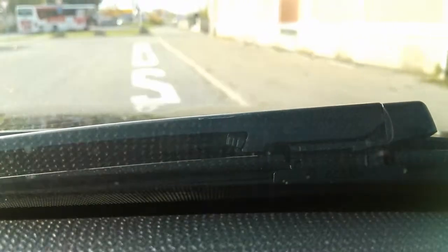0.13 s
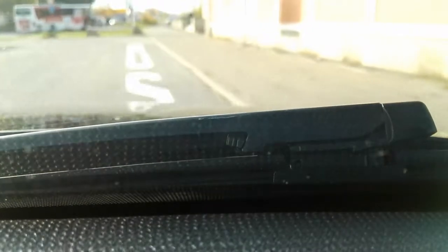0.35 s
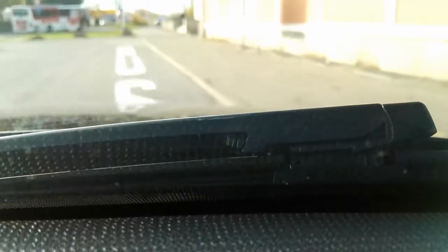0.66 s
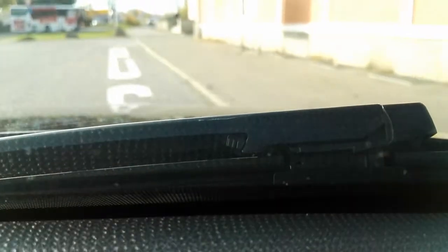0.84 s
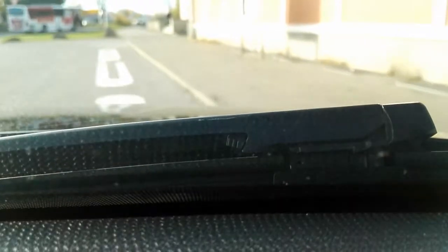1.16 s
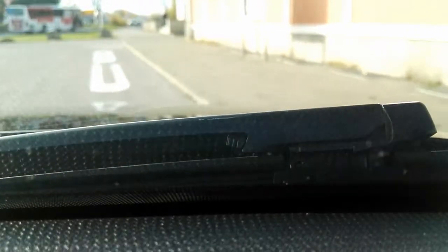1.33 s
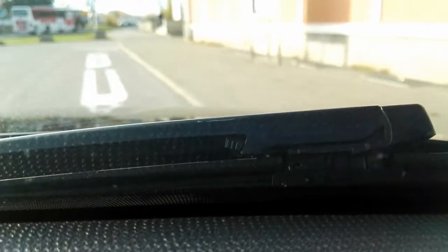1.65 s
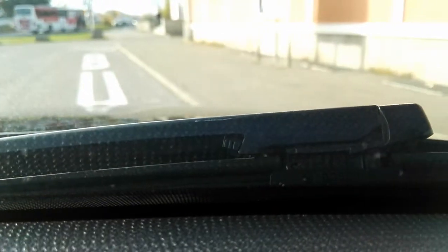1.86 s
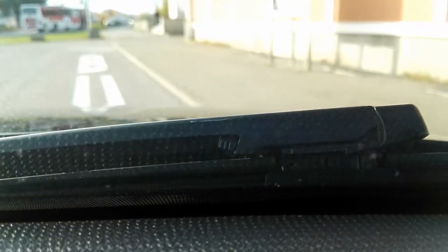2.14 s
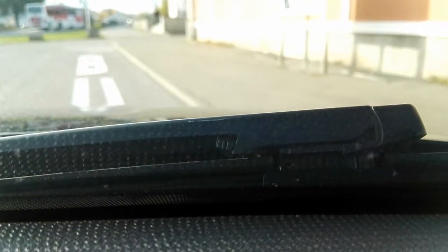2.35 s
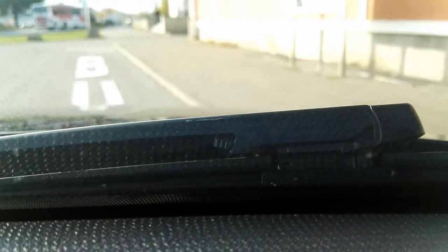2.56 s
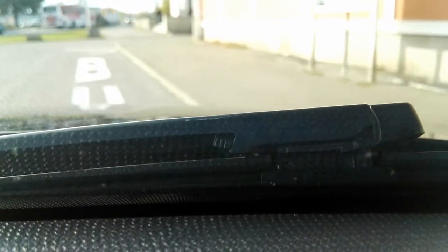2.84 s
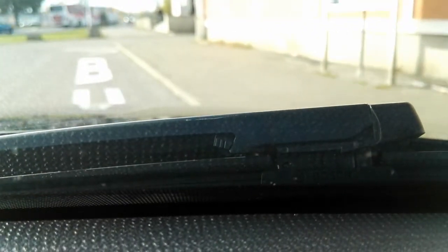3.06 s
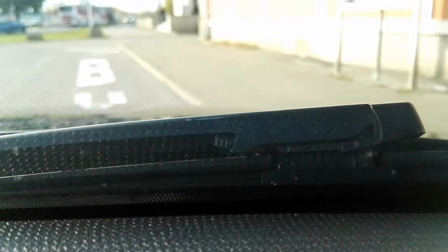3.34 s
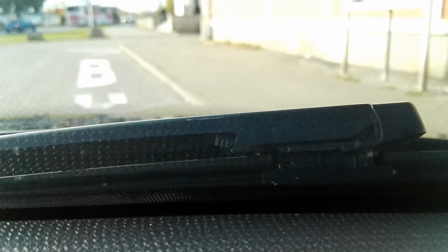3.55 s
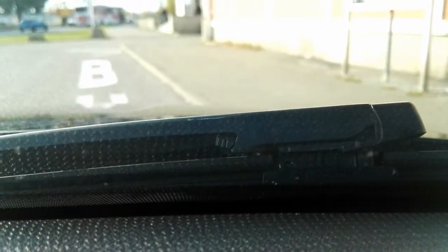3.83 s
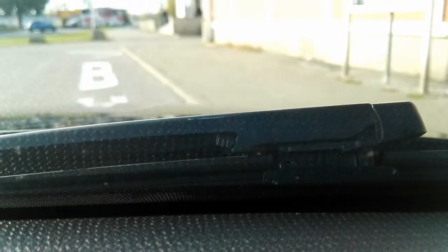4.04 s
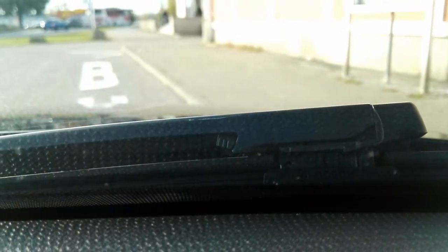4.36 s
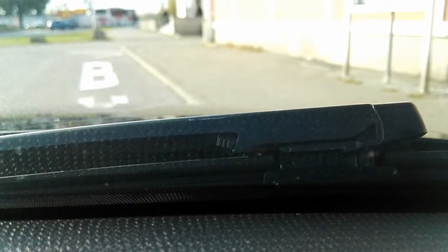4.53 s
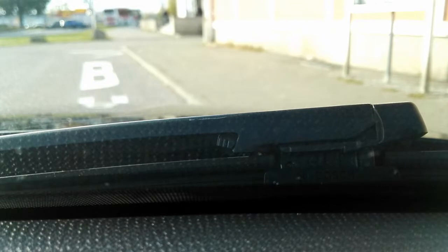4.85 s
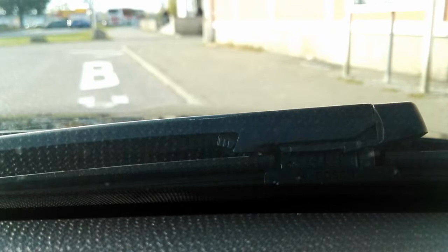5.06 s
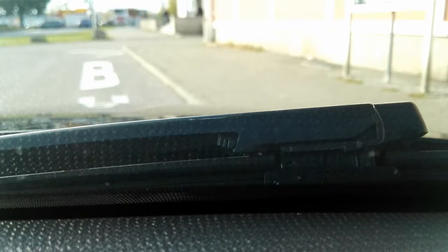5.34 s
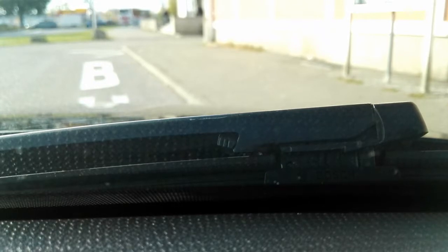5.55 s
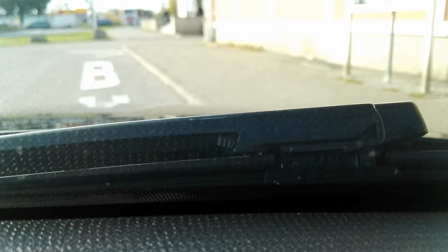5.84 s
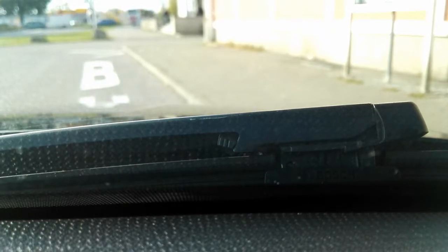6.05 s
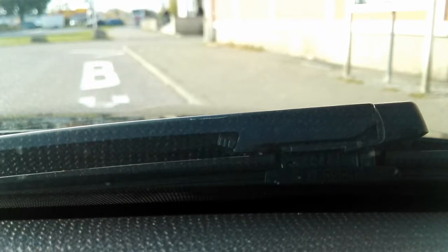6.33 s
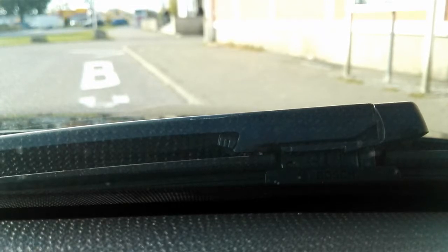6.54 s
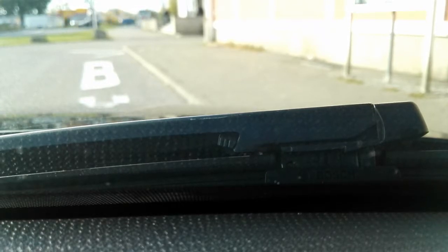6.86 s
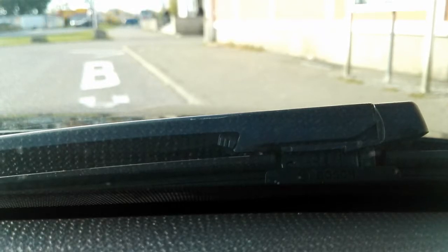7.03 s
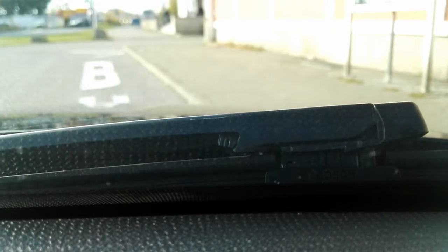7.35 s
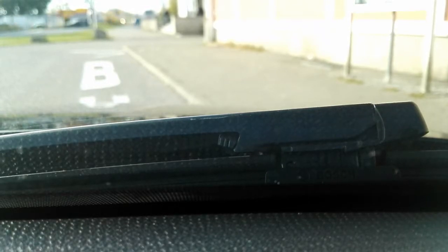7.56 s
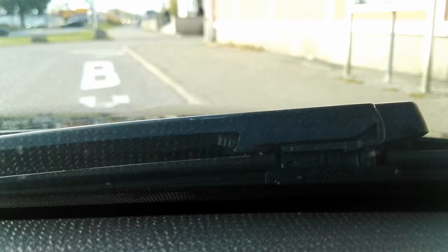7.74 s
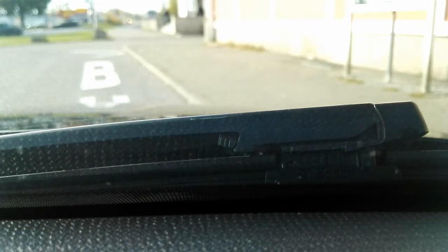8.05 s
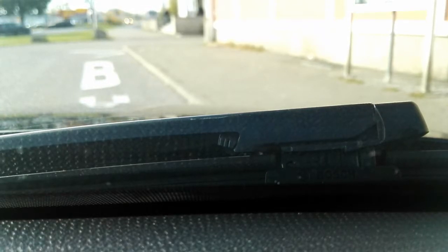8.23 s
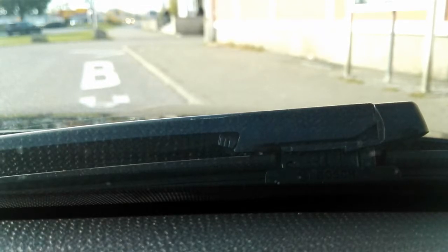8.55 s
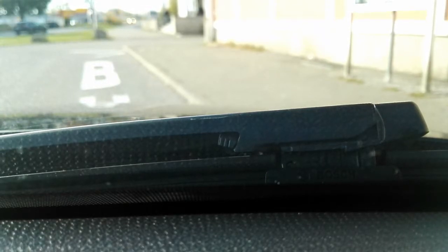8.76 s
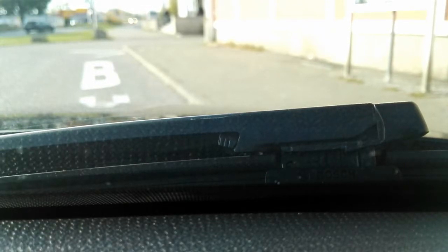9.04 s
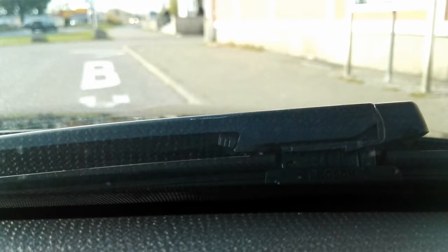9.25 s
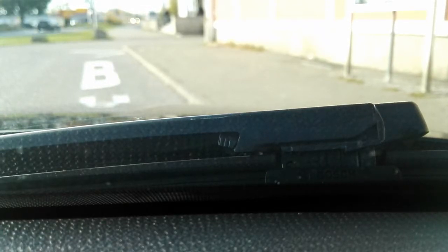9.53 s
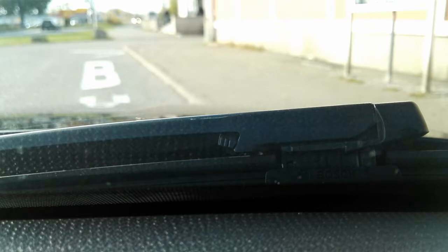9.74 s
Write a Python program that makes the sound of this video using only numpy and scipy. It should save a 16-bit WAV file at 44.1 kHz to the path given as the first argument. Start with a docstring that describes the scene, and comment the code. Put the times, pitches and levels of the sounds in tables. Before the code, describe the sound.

Heard from the dashboard in a small cabin: a wavering bass drone of tyres swells and dies as the car stops. The engine keeps idling under indicator ticks, faint climbing hums, seat-cloth rubbing and clusters of padded knocks. Four rapid handbrake teeth rasp, fittings scrape, then the door latch snaps open, outside hiss brightens, and strong dull thuds land before more rustling.

```python
"""Car rolling to a stop

Inside a car on paving, heard from the dashboard through two microphone ports. Road rumble (noise through
body resonances and a wavering tone) fades; the engine idles on as firing orders over a noise wash. The turn
signal ticks, cloth rustles as the driver shifts, and levers, belt and latches knock, click and scrape as
ringing modes and gritty noise bursts. The opened door lets in the idle throb and the hiss of the street."""
import sys
import numpy as np
from scipy import signal
from scipy.fft import irfft, next_fast_len
from scipy.io import wavfile
from scipy.ndimage import uniform_filter1d

SR = 44100
rng = np.random.default_rng(int(sys.argv[2]) if len(sys.argv) > 2 else 0)


def int16_out(signal):
    """Quantize to a 16-bit WAV file."""
    q = np.round(np.clip(np.atleast_2d(signal).T, -1, 1) * 32767)
    wavfile.write(sys.argv[1], SR, q.astype(np.int16))


N = 436149  # samples in the scene


def amp(db):
    """Level to amplitude: 20 dB is a factor of ten."""
    return 10 ** (np.asarray(db) / 20)


def read(points, hz):
    """Interpolates a spectral curve along a logarithmic frequency axis."""
    f, value = np.transpose(points)
    return np.interp(np.log(hz + 1), np.log(f + 1), value)


def columns(rows):
    """Interpolates each column of a time curve linearly at every sample."""
    s, *values = np.transpose(rows)
    return [np.interp(np.arange(N) / SR, s, v) for v in values]


def add(mix, start_s, sound):
    """Superposes a sound on the mix from its start time."""
    part = mix[:, round(start_s * SR):][:, :sound.shape[-1]]
    part += sound[..., :part.shape[1]]


def noise(size, colour_db):
    """Coloured noise, rms 1 in the port average; coherence between the ports falls with frequency."""
    # Coherence of the two ports: frequency_hz, likeness (0 to 1)
    coherence = [(60, 0.98), (130, 1), (290, 0.89), (600, 0.61), (1400, 0.26), (14000, 0.019)]
    # Phase by which the left port leads: frequency_hz, lead_rad
    phase_lead = [(0, 0), (340, 0), (600, 3.2), (1380, 3.3), (2670, 9.8), (3530, 3.5), (7410, -13.1),
                  (12700, -33.4)]
    # Left level minus right level: frequency_hz, difference_db
    balance = [(200, 0), (680, .5), (1260, -1), (2310, .5), (4240, -1.5), (7800, 3), (10500, 8), (14300, 9)]
    hz = np.fft.rfftfreq(size, 1 / SR)
    a, b, c, d = rng.standard_normal((len(hz), 4)).T
    left = a + 1j * b
    independent = c + 1j * d
    same = np.clip(read(coherence, hz), 0, 1)
    right = same * left * np.exp(-1j * read(phase_lead, hz)) + np.sqrt(1 - same ** 2) * independent
    side = amp(read(balance, hz) / 2)
    pair = irfft(np.array([left * side, right / side]) * amp(colour_db(hz)), size)
    return pair / np.sqrt(np.mean(pair.mean(0) ** 2))


def steady(colour_db):
    """Stationary coloured noise lasting the whole scene."""
    return noise(next_fast_len(N), colour_db)[:, :N]


def peak_db(hz, centre_hz, width_hz):
    """Resonance curve with steep skirts, 6 dB down at the edges of its width."""
    return -20 * np.log10(1 + (2 * (hz - centre_hz) / width_hz) ** 2)


def wander(points_per_s):
    """Slow random modulation of rms 1: straight lines between random values."""
    values = rng.standard_normal(N // 100)
    x = np.interp(np.arange(N) * points_per_s / SR, np.arange(N // 100), values)
    return x / x.std()


def swelled(floor_db, rows):
    """Power addition of a floor and bell-shaped swells (middle_s, peak_db, length_s); returns the gain."""
    edge_db = -10  # level at the two ends of a swell, relative to its peak
    t = np.arange(0, N, 64) / SR  # coarse time grid
    s, db, length = np.transpose(rows)[:, :, None]
    bells = amp(db + edge_db * (2 * (t - s) / length) ** 2)
    swells = np.sqrt((bells ** 2).sum(0))
    return np.hypot(amp(floor_db), np.interp(np.arange(N) / SR, t, swells))


def road():
    """Forced resonance: paving keeps three body modes ringing, and joints and dips make them swell."""
    # Floor under the swells, fading as the car slows: time_s, boom_level_db, drumming_level_db
    road_floor = [(0, -35.5, -28.5), (1.9, -34, -29), (2.4, -37, -34), (2.55, -35, -52), (3.1, -43, -42),
                  (4.0, -40, -39), (5.0, -56, -47), (6.7, -69, -48), (7.1, -49.5, -52), (9.89, -60, -49)]
    # The floor pan's note wavers over the paving: time_s, pitch_hz
    drum_pitch = [(0, 96.7), (.6, 90.1), (.85, 98.1), (1.1, 87.9), (1.38, 98.5), (1.7, 93.2), (2.0, 91.1),
                  (2.17, 96.6), (2.28, 87.2), (2.5, 94.3)]
    # Wheels cross paving joints and the floor drums up: middle_s, swell_peak_db
    joints = [(.01, -16.5), (.18, -25), (.39, -21.5), (.58, -22.5), (.8, -20.5), (1.0, -26), (1.12, -29),
              (1.38, -22.5), (1.59, -25), (1.72, -25), (1.85, -21.5), (2.05, -31), (2.17, -26), (2.3, -27),
              (2.41, -24), (2.67, -31), (2.85, -30)]
    # The body heaves over dips and booms: middle_s, swell_peak_db
    heaves = [(.29, -31.5), (.48, -26), (.92, -32), (1.46, -32), (1.6, -32), (1.98, -33), (2.52, -36)]
    boom_mode, drum_mode, tyre_mode = (44, 14), (93, 20), (200, 60)  # centre_hz, width_hz
    joint_s, heave_s = 0.11, 0.11  # swell lengths

    boom_db, drum_db = columns(road_floor)
    boom, drum, tyres = (steady(lambda hz: peak_db(hz, *mode)) for mode in (boom_mode, drum_mode, tyre_mode))
    # Even out the chance level swings of the two narrow bands
    boom, drum = (x / np.sqrt(uniform_filter1d(x.mean(0) ** 2, size=3000) + .05) for x in (boom, drum))
    heaving = swelled(boom_db, [(*row, heave_s) for row in heaves])
    drumming = swelled(drum_db, [(*row, joint_s) for row in joints])
    note = np.sqrt(2) * np.sin(2 * np.pi * np.cumsum(columns(drum_pitch)[0]) / SR)
    return heaving * boom + drumming * (amp(-2.5) * note + amp(-6.5) * drum + amp(-13.5) * tyres)


def engine():
    """Harmonic series of the firing rate, slightly unsteady, over broadband noise through the bulkhead."""
    # Idle: time_s, mean_firing_rate_hz, reference_level_db
    idle = [(0, 26.5, -54), (4.2, 26.3, -47), (6.8, 26.5, -48), (7.0, 26.8, -36), (9.89, 26.9, -39.5)]
    # Firing orders: multiple_of_firing_rate, mean_level_db (relative to the idle reference)
    orders = [(1, 2.5), (2, -7.5)]
    # Engine wash before its flicker: time_s, low_level_db, upper_level_db
    wash = [(0.0, -37, -50.5), (3.3, -37, -51.5), (3.8, -35.5, -50.5), (6.11, -38, -51), (7.02, -35.5, -48),
            (9.89, -37.5, -46.5)]
    # Spectrum of the low wash: frequency_hz, relative_density_db (per hertz)
    low_colour = [(35, -20), (60, -1), (91, -5.5), (215, -1.5), (275, -11), (355, -7), (436, -22),
                  (494, -14), (553, -32), (700, -15), (910, -31), (1540, -120)]
    # Spectrum of the upper wash: frequency_hz, relative_density_db (per hertz)
    upper_colour = [(260, -8), (450, 2), (523, 1.5), (1130, -10.5), (2000, -23.5), (2600, -21.5),
                    (4400, -120)]

    firing_hz, idle_db = columns(idle)
    turns = np.cumsum(firing_hz * (1 + 0.0085 * wander(8.4))) / SR  # phase in firing cycles
    throb = sum(amp(db + 1.5 * wander(5)) * np.sin(2 * np.pi * k * turns) for k, db in orders)
    low_db, upper_db = columns(wash)
    low = amp(low_db + 1.42 * wander(25)) * steady(lambda f: read(low_colour, f))
    upper = amp(upper_db + 2.5 * wander(25)) * steady(lambda f: read(upper_colour, f))
    return np.sqrt(2) * amp(idle_db) * throb + low + upper


def hums():
    """Two-tone chord: faint climbing hums, each with a weaker partner at 4/3 of its frequency."""
    # One list for each hum: time_s, pitch_hz, lower_tone_peak_db
    rises = [
        [(2.45, 123.5, -47), (3.0, 130.8, -41), (3.7, 140, -38), (4.1, 152.3, -39)],
        [(6.0, 154, -52), (6.5, 153, -41), (7.2, 167, -48)],
    ]
    out = np.zeros((2, N))
    for rows in rises:
        s, hz, db = np.transpose(rows)
        t = np.arange(s[0], s[-1], 1 / SR)
        phase = 2 * np.pi * np.cumsum(np.interp(t, s, hz)) / SR
        chord = np.sin(phase) + amp(-4) * np.sin(phase * 4 / 3)
        add(out, s[0], amp(np.interp(t, s, db)) * chord)
    return out


def rustle():
    """Friction noise: cloth strokes swell and flicker over the street hiss, with a changing top band."""
    # Outside hiss, louder once the door is open, before flicker and top band: time_s, level_db
    street_hiss = [(0, -64), (.9, -64), (2.8, -68), (3.7, -62), (4.3, -52.5), (5.8, -57), (6.66, -56.5),
                   (6.95, -47), (8.3, -45), (8.48, -52), (8.9, -44.5), (9.89, -48.5)]
    # Strokes of cloth on the seat, before flicker and top band: middle_s, swell_peak_db, length_s
    strokes = [(.0, -52.5, 0.31), (0.187, -54.5, 0.17), (.98, -57, 0.26), (1.338, -50, 0.27),
               (1.628, -53.5, 0.27), (1.92, -51.5, 0.41), (2.46, -49.5, 0.47), (3.113, -56.5, 0.82),
               (3.338, -49, 0.26), (3.899, -49.5, 0.21), (4.155, -48, 0.25), (4.5, -48.5, 0.17),
               (4.689, -50, 0.11), (4.992, -46.5, 0.5), (5.24, -54.5, 0.29), (5.87, -54, 0.12),
               (6.492, -46.5, 0.16), (7.21, -45.5, 0.25), (8.375, -44.5, 0.16), (8.688, -41.5, 0.48),
               (9.307, -46.5, 0.38), (9.568, -49.5, 0.23)]
    # Spectrum of the body of the hiss: frequency_hz, relative_density_db (per hertz)
    body_colour = [(710, -32), (1200, -7), (1730, -3), (3240, 0), (3630, -2), (4390, -2.5), (8220, -4.5),
                   (13000, -10), (14600, -4.5)]
    # Top band: centre_hz, width_hz
    sheen_band = (12460, 5500)
    # Top band relative to the body: time_s, relative_level_db
    sheen_level = [(0, -6), (3.3, -6), (3.65, -13), (4, -4), (6, -11), (6.5, -1), (8.3, -11), (8.7, 2),
                   (9, -6.5), (9.89, -6)]

    (hiss_db,), (sheen_db,) = columns(street_hiss), columns(sheen_level)
    body = steady(lambda hz: read(body_colour, hz))
    sheen = amp(sheen_db) * steady(lambda hz: peak_db(hz, *sheen_band))
    flicker = amp(1.1 * wander(40))
    return swelled(hiss_db, strokes) * flicker * (body + sheen)


def relay():
    """Impulse response: the turn signal's contact arm snaps and chatters, ringing its small case."""
    first_s, period_s, cycles = 2.8795, .7987, 7
    # Closing and opening: delay_s (into the cycle), peak_db
    strokes = [(0, -29), (.4, -37.5)]
    # Case modes before each snap's random changes: frequency_hz, level_db, t60_s
    case_modes = [(410, 4, .08), (2550, 0, .012), (3200, -2, .012), (4400, -1, .012), (6000, -5, .01)]
    t = np.arange(SR // 8) / SR
    hz, mode_db, t60 = np.transpose(case_modes)[:, :, None]
    out = np.zeros((2, N))
    for cycle in range(cycles):
        for delay_s, db in strokes:
            # No two snaps ring alike
            uneven_db, uneven_pitch = rng.standard_normal((2, len(case_modes), 1))
            decay = amp(mode_db + 2 * uneven_db - 60 * t / t60)
            case = (decay * np.sin(2 * np.pi * hz * (1 + .03 * uneven_pitch) * t)).sum(0)
            hits = rng.random(len(t)) < .06  # sparse contacts, shared by both ports
            chatter = rng.standard_normal((2, len(t))) * hits * amp(-60 * t / 0.092)
            chatter = chatter + 0.22 * chatter[::-1]  # some of each port leaks into the other
            snap = signal.fftconvolve(chatter, case[None], axes=1)[:, :len(t)]
            add(out, first_s + cycle * period_s + delay_s, amp(db) * snap / abs(snap).max())
    return out


def gritty_burst(modes, db, centre_hz, spread, t60, swell_s=0.00057):
    """Stick-slip friction: rough noise shaped by resonances (centre_hz, width_hz, level_db) near one pitch."""
    crest_db = 6  # nominal peak of a burst over the rms of its noise
    t = np.arange(SR // 4) / SR
    shift = 1 + .025 * rng.standard_normal(len(modes))  # each touch seats the parts differently

    def colour_db(hz):
        """Sum of resonance curves over a faint floor, under a log-frequency bell."""
        rings = sum(amp(d + peak_db(hz, f * k, w)) for (f, w, d), k in zip(modes, shift)) + amp(-20)
        return 20 * np.log10(rings) - 6 * (np.log2((hz + 1) / centre_hz) / spread) ** 2

    slips = rng.standard_normal(128)
    grit = amp(3.2 * np.interp(t * 400, np.arange(128), slips))  # 400 slips a second
    rise = np.minimum(t / swell_s, 1) ** 1.2
    decay = amp(-60 * (np.maximum(t - swell_s, 0) / t60) ** 1.33)
    return amp(db - crest_db) * noise(len(t), colour_db) * rise * decay * grit


def ratchet():
    """Repeated impact: handbrake teeth pass in quick succession, each ringing the same metal modes."""
    # Teeth: start_s, nominal_peak_db, t60_s
    teeth = [(4.8277, -19, 0.14), (4.844, -14.5, 0.12), (4.861, -15, 0.11), (4.877, -13.5, 0.073)]
    # Rings before each touch's small shift: centre_hz, width_hz, level_db
    ratchet_modes = [(862, 490, 2.5), (2470, 400, 2.5), (2980, 630, 3.5), (4660, 230, -1),
                     (5850, 910, -2.5), (7050, 470, -2), (9000, 1000, -6), (10660, 940, 5),
                     (13100, 3100, 1)]
    out = np.zeros((2, N))
    for start_s, db, t60 in teeth:
        add(out, start_s, gritty_burst(ratchet_modes, db, 3700, 12.0, t60))
    return out


def ticks_scrapes_and_cloth_rubs():
    """Band-shaped friction: fittings tick abruptly or scrape with a swell; low cloth rubs swell softly."""
    # Resonances of latches and fittings before each small shift: centre_hz, width_hz, level_db
    # (the cloth rubs share this colouring)
    fittings = [(514, 780, 27), (950, 2100, 4), (2060, 280, 4), (2690, 820, 10.5), (3410, 190, 15.5),
                (4520, 920, 8.5), (6000, 1600, 7.5), (7600, 1200, 11), (9500, 1060, -1), (10560, 3000, 8.5),
                (11600, 2700, 9), (13260, 610, 16)]
    # Ticks and latches: start_s, nominal_peak_db, centre_hz, spread_octaves, t60_s
    ticks = [(2.662, -33, 2130, 1.34, 0.083), (6.91, -28, 2550, 1.3, 0.09), (2.799, -47, 5000, 1, 0.066),
             (4.058, -42, 3130, 0.88, 0.19), (4.102, -34.5, 2870, 0.88, 0.11),
             (4.213, -36, 2080, 0.9, 0.082), (5.93, -33.5, 7900, 1.8, 0.069),
             (6.357, -31, 7410, 0.47, 0.089), (6.358, -39, 2380, 0.83, 0.062),
             (7.159, -30, 9400, 2.15, 0.14), (7.198, -29, 12400, 0.78, 0.069),
             (7.2, -33.5, 2730, 1.07, 0.098), (7.673, -36, 2490, 2, 0.12),
             (9.056, -30.5, 11900, 0.2, 0.036), (9.735, -32.5, 3050, 0.46, 0.048)]
    # Swelling bursts: start_s, nominal_peak_db, centre_hz, spread_octaves, t60_s, swell_s
    swelling = [(5.053, -28, 3990, 3.5, .09, 0.0074), (4.285, -31, 4950, 2.4, 0.06, 0.006),
                (4.294, -26, 5000, 3, 0.073, 0.0054), (6.026, -23, 912, 2.5, 0.12, 0.03),
                (6.82, -23, 795, 2.34, 0.14, 0.096), (6.969, -20, 755, 1.6, 0.16, 0.0021),
                (7.002, -16, 4300, 0.86, 0.09, 0.0018), (7.015, -17, 8040, 1.2, 0.046, 0.004),
                (8.561, -37, 880, 1, 0.18, 0.067), (8.738, -40.5, 1000, 0.71, .15, 0.037)]
    # The last two rows are low cloth rubs, the mid-range body of a rustle; the others scrape fittings
    scrapes, cloth_rubs = swelling[:-2], swelling[-2:]
    out = np.zeros((2, N))
    for start_s, *touch in ticks + scrapes + cloth_rubs:
        add(out, start_s, gritty_burst(fittings, *touch))
    return out


def knock(db, centre_hz, spread, ring):
    """Modal synthesis: a soft blow and its bounces ring the trim modes near the struck spot."""
    # Trim modes: frequency_hz, level_db, t60_s (before the blow's ring factor)
    panels = [(45.3, -2, 0.45), (103, 4, 0.093), (143.4, -6, 0.11), (173.9, 2, 0.11), (217.7, 2, 0.091),
              (263.5, 2.5, 0.087), (322, 1, 0.086), (392, 1, 0.057), (481, 10, 0.03), (740, -2, 0.094)]
    # The blow and its bounces: delay_s, relative_level_db
    bounces = [(0, 2), (.016, -9.5), (.033, -9.5)]
    t = np.arange(SR // 3) / SR
    blow = np.zeros((2, len(t)))
    for (hz, mode_db, t60), phase in zip(panels, rng.random(len(panels))):
        near_db = -6 * (np.log2(hz / centre_hz) / spread) ** 2
        # Padded blows; big panels take longer to move
        build = (1 - np.exp(-t / (.45 / hz + .002))) ** 2
        # A small random time offset between the ports, new for each mode and blow
        offset_s = .0006 * min(hz / 300, 1) * (phase - .5) * np.array([[1], [-1]])
        tone = np.sin(2 * np.pi * (hz * (t + offset_s) + .2 * phase))
        blow += build * amp(mode_db + near_db - 60 * t / (t60 * ring)) * tone
    out = np.zeros_like(blow)
    for delay_s, bounce_db in bounces:
        add(out, delay_s, amp(bounce_db) * blow)
    return amp(db) * out / abs(out).max()


def knocks():
    """Superposition of the dull knocks, each with its own struck spot and damping."""
    # Knocks: start_s, peak_db, centre_hz, spread_octaves, ring_factor (on each t60)
    blows = [(1.185, -17, 43, .3, 1.3), (2.659, -21.5, 390, 0.64, 0.82), (3.692, -17, 198.8, 0.46, 0.69),
             (3.873, -15, 130, 1.46, 1.02), (3.906, -18.5, 252, 0.19, 0.63), (4.06, -13, 245, 0.64, 0.89),
             (4.11, -9, 256.6, 0.58, 0.49), (4.212, -16, 268, 0.57, 0.56), (4.294, -19, 229.2, 0.67, 0.59),
             (4.83, -21.5, 248, 0.54, 1.04), (4.862, -18, 230, 1, 0.71), (4.891, -18, 220, 0.88, 0.38),
             (5.063, -8.5, 233, 0.44, 0.48), (5.379, -25, 235, 0.21, 1.7), (5.49, -15, 174.5, 0.64, 0.45),
             (5.532, -13.5, 109.5, 0.41, 0.48), (5.566, -17, 143, 0.61, 0.52),
             (6.052, -13.5, 351, 0.5, 0.47), (6.071, -16.5, 342, 0.28, 0.58), (6.874, -14, 46, 0.32, 0.58),
             (7.484, -4.5, 230, 0.57, 0.9), (7.566, -7.5, 218, 0.69, 0.57), (7.575, -10.5, 194, 0.52, 0.97)]
    out = np.zeros((2, N))
    for start_s, *blow in blows:
        add(out, start_s, knock(*blow))
    return out


def scene():
    """Linear superposition of all sources in the cabin."""
    background = road() + engine() + hums() + rustle()
    return background + relay() + ratchet() + ticks_scrapes_and_cloth_rubs() + knocks()


def record(dry):
    """Band limiting: a linear-phase low-pass filter removes the highest frequencies."""
    edge_hz = 14400
    lowpass = signal.firwin(511, edge_hz, window=("kaiser", 9), fs=SR)
    return signal.oaconvolve(dry, lowpass[None], "same")


dry = scene()
out = record(dry)
int16_out(out)
```